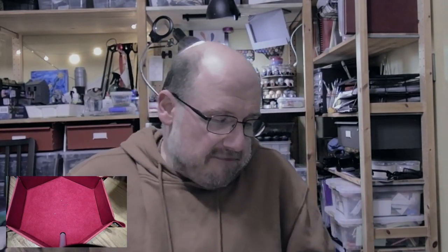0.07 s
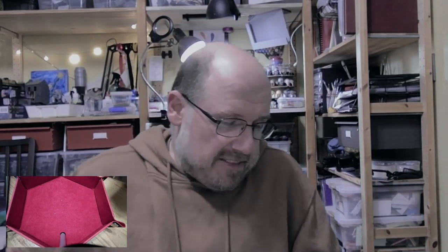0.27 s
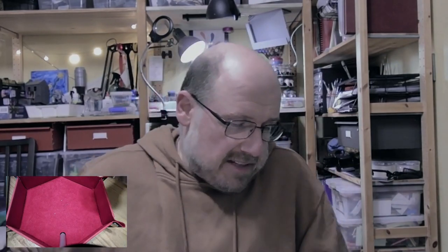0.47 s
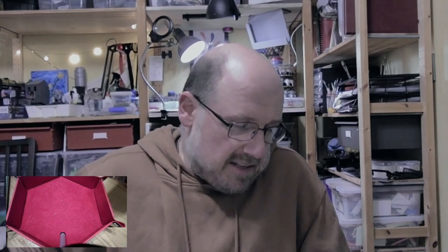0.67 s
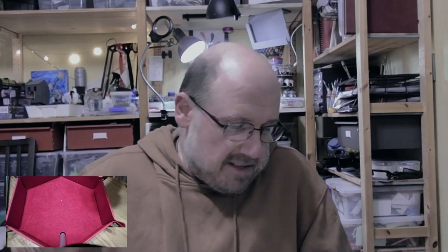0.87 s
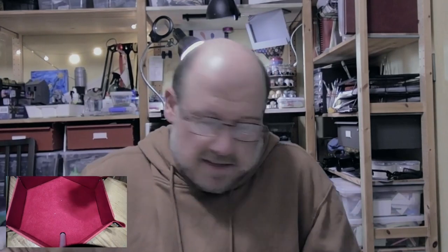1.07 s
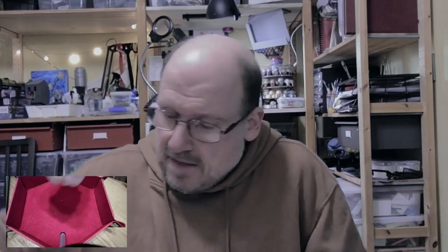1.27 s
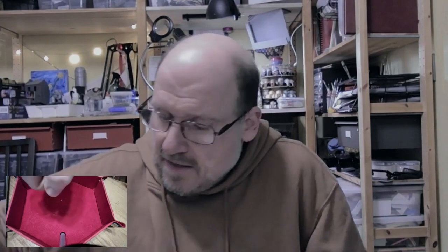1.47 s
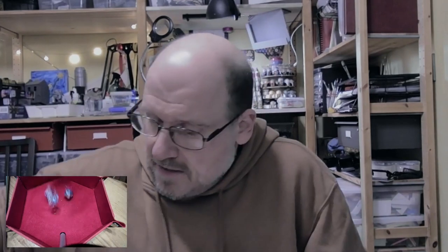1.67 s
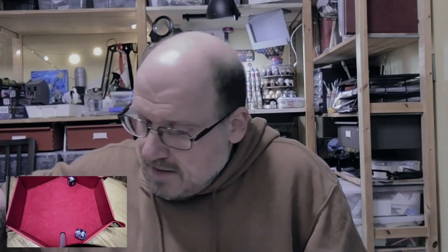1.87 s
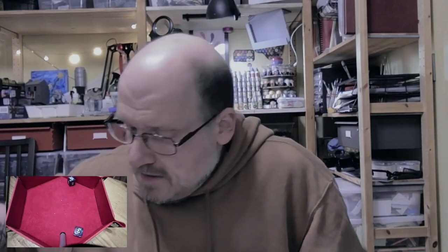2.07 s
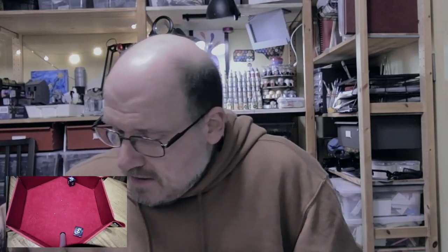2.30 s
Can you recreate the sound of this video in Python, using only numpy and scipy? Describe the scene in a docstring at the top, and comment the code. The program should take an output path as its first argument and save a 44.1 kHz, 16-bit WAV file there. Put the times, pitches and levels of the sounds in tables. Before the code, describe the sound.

Dice are shaken in a hand, clicking and sliding against each other, before landing in a felt tray with cushioned knocks and a brief low ring. The sound is close, in a small room where a fan hums faintly.

```python
"""A small workroom with a faint fan hum, heard through one close microphone.
Two dice are shaken in a cupped hand. They clack and slide against each other, and each hit rings
both the dice and the hollow of the hand. Then they drop into a felt tray and land with dull knocks
that leave low and middle tones lingering and set the microphone stand swaying."""
import sys
import numpy as np
from scipy import signal
from scipy.fft import rfft, irfft
from scipy.io import wavfile

SR = 44100
rng = np.random.default_rng(int(sys.argv[2]) if len(sys.argv) > 2 else 0)


def to_wav(s):
    """Save 16-bit WAV."""
    ch = np.atleast_2d(s).T  # columns
    pcm = np.round(np.clip(ch, -1, 1) * 32767)  # PCM
    wavfile.write(sys.argv[1], SR, pcm.astype(np.int16))


N = 103061

SNAP_TOP_HZ = 12200  # treble limit of the snaps and grazes


def clacks():
    """Each hit rings the dice and the hand's hollow; returns the direct sound and what the room hears."""
    # die hits die: start_s, level_db, pitch_hz, hollow_db, body_db, snap_db (last three added to level_db)
    hits = [(0.0842, -18.5, 7220, -3.5, -2, -18), (0.0907, -22, 6450, -6, 3, -7.5),
            (0.1111, -26.5, 6060, -9, 0, -10), (0.1464, -15.5, 5900, -10, -1.5, -4),
            (0.1512, -30, 6150, 3, 2, -18), (0.1725, -14.5, 6300, -11.5, -10, -9),
            (0.1877, -18.5, 5230, -9, -5, -7), (0.2202, -30.5, 5860, -3, 1, -17),
            (0.2659, -23, 5350, -1, -6.5, -20), (0.2881, -16.5, 6910, -9, 0.5, -18),
            (0.295, -24, 6300, -2, 4.5, -16), (0.3848, -10.5, 5970, -14, 2, -3),
            (0.3885, -18.5, 5470, -7.5, 2, -5), (0.4726, -18.5, 4900, -1.5, -5.5, -21),
            (0.4961, -15.5, 6730, -1.5, 3.5, -33), (0.5061, -31, 5800, 3, 9, -10),
            (0.57, -15.5, 5980, -14, 0, -11), (0.5794, -11.5, 5980, -13.5, -11, -6),
            (0.6093, -13.5, 6220, -15.5, 0, -8), (0.6143, -22.5, 6300, -9, 2.5, -8),
            (0.7137, -11, 6430, -16.5, -5.5, -4), (0.7224, -19, 6500, -13, 0.5, -4),
            (0.7852, -6, 6180, -14, -30, -14.5), (0.7945, -19, 6500, -8.5, -7, -12),
            (0.8056, -33, 6340, 0, 8.5, -9), (0.8101, -22.5, 4680, -6, -7, -21),
            (0.9123, -9.5, 7280, -14.5, -11.5, -11.5), (0.9482, -29, 5820, -28, -3, -11),
            (0.9558, -21, 6500, -23, -2.5, 1.5), (0.9928, -15, 5820, -14, -11, -9),
            (1.002, -13.5, 5360, -15.5, -6.5, -4.5), (1.1108, -14, 7040, -10, -3, -12),
            (1.1177, -27, 6300, -8, 1.5, -9), (1.1693, -11.5, 6780, -37, -3, -5.5),
            (1.1745, -19, 6470, -28, -0.5, -15), (1.177, -26, 6710, -15, -2, 0),
            (1.2116, -20.5, 5700, -8.5, -2, -9), (1.262, -19, 4950, -9.5, -11, -18.5),
            (1.3507, -26.5, 7400, -10, 1, -19), (1.3782, -24, 5800, -32, 6, -2.5),
            (1.4239, -35.5, 5540, -7, 7, -12), (1.4724, -30, 5370, -14, 4.5, -32),
            (1.51, -34, 5550, -15, 2.5, -25), (1.5223, -29, 4900, -23, -8, -30),
            (1.6617, -25, 6070, -17, -9.5, 7)]
    # the bright clack: pitch_ratio, level_db, fade_s (time to fall by 60 dB)
    clack_tones = [(.9, 0.5, 0.0053), (1.0, -2.5, 0.009), (1.09, -1.5, 0.01)]
    # the hollow of the hand: pitch_hz, level_db, fade_s
    hollow_tones = [(1220, -7, 0.0103), (1935, 4, 0.006), (2420, 0.5, 0.0019)]
    # the body of the dice: pitch_hz, level_db, fade_s
    body_tones = [(3940, 5, 0.0095), (4480, 0, 0.011)]
    detune = 0.017
    room_fade_ratio = 0.73  # the room hears the hand from all sides, which blurs and shortens its tones
    direct, to_room, snaps = np.zeros((3, N))
    for start_s, db, hz, hollow_db, body_db, snap_db in hits:
        add(snaps, start_s, from_db(db + snap_db) * snap(snap_db))
        parts = ((clack_tones, hz, 0, 0),
                 (hollow_tones, 1, hollow_db, detune),
                 (body_tones, 1, body_db, detune))
        for tones, pitch, part_db, part_detune in parts:
            gain = from_db(db + part_db)
            blurred = np.array(tones) * [1, 1, room_fade_ratio]
            add(direct, start_s, gain * ring(tones, .02, pitch, part_detune))
            add(to_room, start_s, gain * ring(blurred, .02, pitch, part_detune))
    ringing = filtered(np.array([direct, to_room]), hz=8600, kind="low", order=4)
    return filtered(ringing + snaps, hz=1290, kind="high")


def snap(snap_db):
    """A sharp click scatters among the fingers; a higher snap_db makes it brighter."""
    t = np.arange(int(.03 * SR)) / SR
    scatter = 1.1 * unit(rng.standard_normal(len(t)) * fade(t, fade_s=.007))
    click = filtered((t == 0) + scatter, hz=5500, kind="high")
    top_hz = SNAP_TOP_HZ * 2 ** (snap_db / 55)  # one octave per 55 dB
    return unit(filtered(click, top_hz, "low", order=3))


def wash_and_scrapes():
    """A soft opening wash, like a clack's fading echo, then short grainy scrapes of die on die."""
    # the opening wash (first row), then the scrapes: start_s, length_s, level_db
    bursts = [(0.0, 0.06, -52.5), (0.141, .02, -51), (0.396, .008, -46), (.953, 0.021, -41),
              (1.172, 0.024, -44.5), (1.372, 0.018, -45.5)]
    # their tone colour: pitch_hz, level_db
    colour = [(1000, -30), (2100, 0), (3000, -11.5), (3950, 4.5), (4900, 2), (6200, 0), (8000, 1.5),
              (11000, -10), (16000, -28)]
    level = np.zeros(N)
    for start_s, length_s, db in bursts:
        progress = np.linspace(0, 1, int(length_s * SR))
        swell = np.sqrt(np.abs(np.sin(np.pi * np.sqrt(progress))))
        add(level, start_s, from_db(db) * swell)
    steps = np.arange(0, N, 32)
    grain_db = np.interp(np.arange(N), steps, rng.standard_normal(len(steps)))
    return level * np.sqrt(N) * unit(noise(colour) * from_db(grain_db))


def landings():
    """The dice tumble in the tray; each cushioned knock brushes the felt and leaves lingering tones."""
    # die hits tray: start_s, level_db, thud_db, slap_db (last two added to level_db)
    hits = [(1.783, -4.5, -1.5, -7.5), (1.8083, -2.5, -5, -15), (1.8206, -23.5, 8, -27),
            (1.833, -42, 11, -21), (1.85, -60, -7, -9), (1.8654, -10, -7.5, -21), (1.8896, -21, 8, -12.5),
            (1.915, -36, 12, -8), (1.9335, -22, -4, -14), (1.9595, -13.5, -2, -43), (1.975, -31, 4, -24),
            (2.0749, -38.5, 8.5, -10)]
    # the tray's middle knock: pitch_hz, level_db, fade_s
    knock_tones = [(880, 2, 0.016), (1285, -1, 0.0078), (913, -17, 0.046)]
    # the tray's low thud: pitch_hz, level_db, fade_s
    thud_tones = [(210, -3, 0.012), (350, 1, 0.015), (560, -4.5, 0.0046)]
    # the tray's high slap: pitch_hz, level_db, fade_s
    slap_tones = [(1844, 10, 0.0065), (2220, -6, 0.0014)]
    # low and middle tones that linger after the knocks: pitch_hz, level_db, fade_s
    lingering_tones = [(155, -15, 0.66), (262, 8, 0.52), (350, 7.5, 0.37), (398, -4, 0.25), (481, 14, 0.22),
                       (542, 10.5, 0.43), (565.6, -1, 0.6), (780, -12, 0.84), (816, -19, 0.6),
                       (840, -3, .25), (950, -4, 0.2), (960, -14, 0.52), (1105, -19, 0.3),
                       (1160, -12, 0.88)]
    # tone colour of a corner brushing the felt: pitch_hz, level_db
    brush_colour = [(1500, 4), (2700, 9), (4500, 2.5), (6200, -8), (8500, 1), (11000, -12), (15000, -18)]
    tray, brush_level, blows = np.zeros((3, N))
    brush_shape = unit(fade(np.arange(SR // 20) / SR, fade_s=0.033))
    for start_s, db, thud_db, slap_db in hits:
        knock, thud, slap = (ring(tones, length_s=.06, detune=0.0037)
                             for tones in (knock_tones, thud_tones, slap_tones))
        add(tray, start_s, -from_db(db) * (knock + from_db(thud_db) * thud + from_db(slap_db) * slap))
        add(brush_level, start_s, from_db(db - 27.5) * brush_shape)
        add(blows, start_s, from_db([db]))
    lingering = from_db(-9.5) * signal.fftconvolve(blows, ring(lingering_tones, length_s=1))[:N]
    cushioned = filtered(tray + lingering, hz=2460, kind="low", order=4)  # felt softens the treble
    knocks = filtered(cushioned, hz=121, kind="high")
    return knocks + brush_level * np.sqrt(N) * unit(noise(brush_colour))


def stand_sway():
    """Shaken through the table, the microphone stand builds up a deep tone that dies away."""
    start_s, rise_s, pitch_hz, peak_db = 1.818, 0.11, 34.9, -29
    t = np.maximum(np.arange(N) / SR - start_s, 0)
    swell = t / rise_s * np.exp(1 - t / rise_s)
    return from_db(peak_db) * swell * np.sin(2 * np.pi * pitch_hz * t)


def hand_rustle():
    """The shaking hand rubs softly and the dice graze each other, until the hand opens."""
    # the low rub of the hand: pitch_hz, level_db (per Hz)
    rub_colour = [(40, -115), (110, -100), (230, -102), (400, -99), (700, -106), (1200, -108), (3000, -125)]
    # a tiny graze: pitch_hz, level_db, fade_s
    graze_tones = [(4100, -1, .004), (5500, 0, 0.0027), (7300, -2, 0.0035), (9700, -7.5, .002)]
    grazes_per_s, graze_db, spread_db = 86, -41, 2.5
    end_s, fade_out_s = 1.65, 0.37
    touches = (rng.random(N) < grazes_per_s / SR) * from_db(graze_db + spread_db * rng.standard_normal(N))
    grazes = signal.fftconvolve(touches, ring(graze_tones, length_s=.02))[:N]
    shaking = np.clip((end_s - np.arange(N) / SR) / fade_out_s, 0, 1)
    return (noise(rub_colour) + filtered(grazes, SNAP_TOP_HZ, "low")) * shaking


def bumps():
    """Two faint, low bumps are heard once the dice rest."""
    # soft swells of one tone each: start_s, length_s, pitch_hz, level_db
    swells = [(2.202, 0.029, 385, -65), (2.248, 0.036, 350, -64)]
    out = np.zeros(N)
    for start_s, length_s, hz, db in swells:
        t = np.arange(int(length_s * SR)) / SR
        swell = np.sin(np.pi * t / length_s)
        add(out, start_s, from_db(db) * np.sqrt(2) * swell * np.sin(2 * np.pi * hz * t))
    return out


def room_echo(x):
    """Sound from one spot bounces around the room; each band of pitch fades at its own pace."""
    # the room's echo: pitch_hz, level_db (against the direct sound), fade_s
    echo_bands = [(148, 0, 0.49), (426, -8, 0.22), (1020, -7, 0.36), (2050, -7.5, 0.34), (4760, -8.5, 0.3),
                  (8600, -8.5, 0.3), (13000, -7.5, 0.19)]
    gap_s, build_s = 0.001, 0.0052
    t = np.arange(SR // 3) / SR
    build_up = np.clip((t - gap_s) / build_s, 0, 1)
    edges_hz = np.geomspace(90, 18000, 10)
    spectrum = rfft(rng.standard_normal(len(t)))
    bins_hz = np.arange(len(t) // 2 + 1) * SR / len(t)
    tail = 0
    for low, high in zip(edges_hz, edges_hz[1:]):
        hz = np.sqrt(low * high)
        shape = build_up * fade(t, at_hz(echo_bands, hz, column=2))
        band = irfft(spectrum * (bins_hz >= low) * (bins_hz < high), len(t))
        gain = from_db(at_hz(echo_bands, hz)) * np.sqrt(2 * (high - low) / SR)
        tail = tail + gain * unit(band * shape)
    return signal.fftconvolve(x, tail)[:N]


def moving_echo(x, spots=5, step_s=.06):
    """The hand keeps moving, so its sound blends from one spot's echo into the next."""
    position = np.arange(N) / SR / step_s
    shares = (np.sin(np.pi / 2 * np.minimum((position - k) % spots, 2)) for k in range(spots))
    return sum(room_echo(x * share) for share in shares)


def fan():
    """A fan makes a soft rush of air with a few steady tones."""
    # the rush of air: pitch_hz, level_db (per Hz)
    air_colour = [(20, -79.5), (35, -83), (60, -95), (120, -99), (190, -100), (300, -100), (600, -99),
                  (1100, -96.5), (1600, -101), (2300, -104), (4000, -111), (8000, -119), (16000, -124)]
    # the fan's hum: pitch_hz, level_db
    hum_tones = [(192, -71.5), (859, -69.5), (1141, -74.5), (1683, -77.5), (1929, -87.5)]
    t = np.arange(N) / SR
    air = noise(air_colour)
    hum = sum(np.sqrt(2) * from_db(db) * np.sin(2 * np.pi * (hz * t + rng.random())) for hz, db in hum_tones)
    return air + hum


def ring(tones, length_s, pitch=1, detune=0):
    """A struck object rings with fading tones, a little different at each blow; energy one."""
    t = np.arange(int(length_s * SR)) / SR
    out = 0
    for k, (hz, db, fade_s) in enumerate(tones):
        hz = hz * pitch * (1 + detune * rng.normal())
        tone = unit(np.sin(2 * np.pi * hz * t) * fade(t, fade_s))
        out = out + (-1) ** k * from_db(db + rng.normal()) * tone  # every other tone is flipped
    return unit(out)


def noise(colour):
    """Noise whose level at each pitch follows a table."""
    gains = from_db(at_hz(colour, np.arange(N // 2 + 1) * SR / N))
    return irfft(rfft(rng.standard_normal(N)) * gains, N) * np.sqrt(SR / 2)


def fade(t, fade_s):
    """A level that falls by 60 dB every fade_s seconds."""
    return np.exp(-np.log(1000) * t / fade_s)


def from_db(db):
    """Turn decibels into a gain."""
    return 10 ** (np.asarray(db) / 20)


def unit(x):
    """Scale to an energy of one."""
    return x / np.sqrt(np.sum(x ** 2) + 1e-20)


def at_hz(table, hz, column=1):
    """Read a table's column at any pitch, blending between rows."""
    rows = np.array(table)
    return np.interp(np.log(np.maximum(hz, 1)), np.log(rows[:, 0]), rows[:, column])


def filtered(x, hz, kind, order=2):
    """Keep what lies below ("low") or above ("high") a pitch."""
    return signal.sosfilt(signal.butter(order, np.clip(hz, 10, SR * .45), kind, fs=SR, output="sos"), x)


def add(out, start_s, x):
    """Mix a sound in at a given time."""
    i = max(int(start_s * SR), 0)
    out[i:i + len(x)] += x[:N - i]


def scene():
    """Dice in the hand, dice in the tray and the background, in one channel."""
    direct, to_room = clacks() + wash_and_scrapes()
    knocks = landings()
    hand = direct + moving_echo(to_room) + hand_rustle()
    tray = knocks + room_echo(knocks) + stand_sway()
    return (hand + tray + bumps() + fan())[None]


def record(dry):
    """Treble above 16000 Hz is cut steeply."""
    return signal.sosfilt(signal.ellip(10, .1, 80, 16000, fs=SR, output="sos"), dry)


dry = scene()
out = record(dry)
to_wav(out)
```